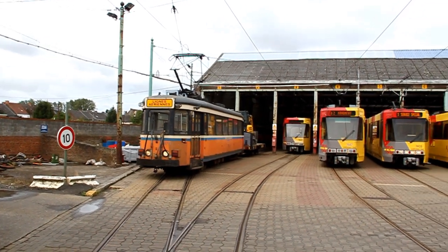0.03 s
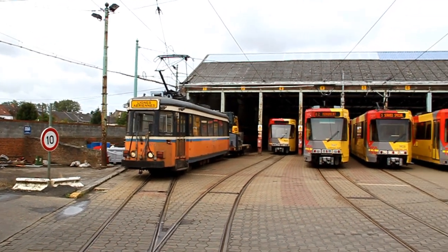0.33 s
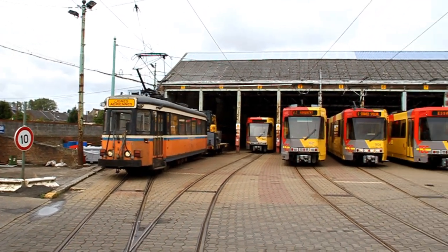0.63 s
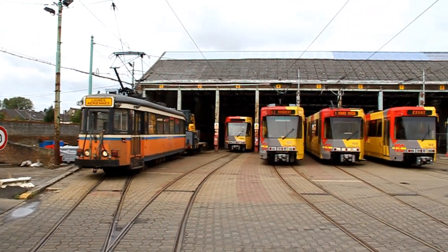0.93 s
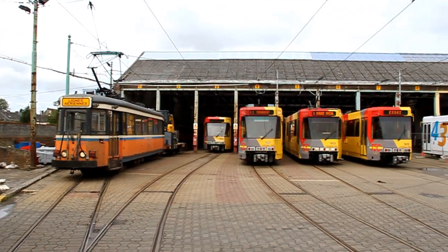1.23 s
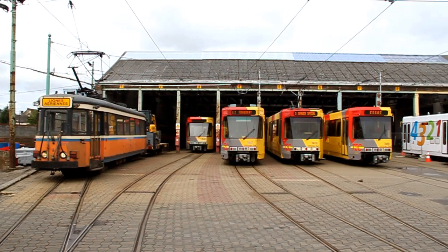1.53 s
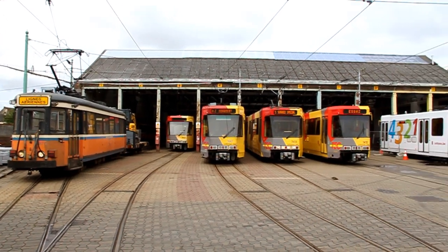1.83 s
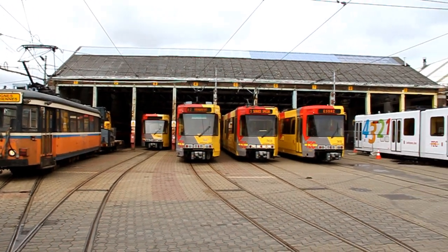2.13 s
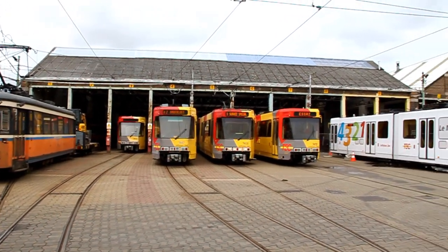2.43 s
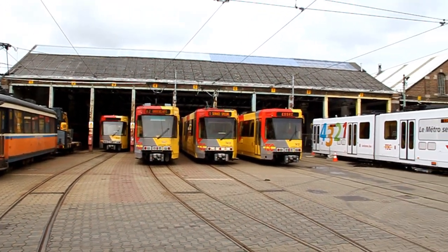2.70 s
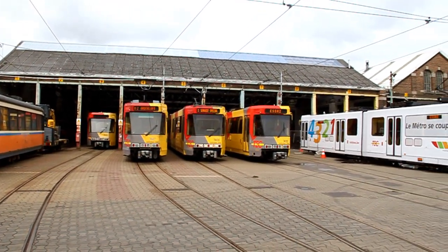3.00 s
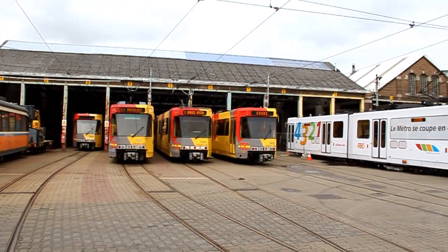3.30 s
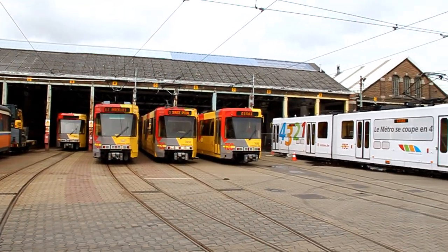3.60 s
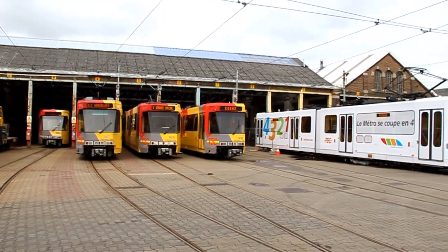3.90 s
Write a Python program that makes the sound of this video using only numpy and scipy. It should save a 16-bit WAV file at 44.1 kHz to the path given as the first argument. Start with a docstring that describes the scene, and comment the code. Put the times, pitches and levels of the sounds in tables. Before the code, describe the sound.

Gusty wind buffets the microphone with uneven rumbles, bumps and brief crackles.

```python
"""An open yard, where gusty wind buffets the microphone of a hand-held camera. Each gust is a burst of
turbulent eddies that brightens as it peaks; the hardest overdrive the capsule, which crackles. Knocks of air or
of the hand make bumps, and the hand rubs the housing, once in a soft, broad swell of hiss. Automatic gain
control ducks the whole sound, the yard's distant hiss included, after every strong gust."""
import sys
import numpy as np
from scipy import signal
from scipy.fft import rfft, irfft, next_fast_len
from scipy.io import wavfile
from scipy.ndimage import uniform_filter1d

SR = 44100
rng = np.random.default_rng(int(sys.argv[2]) if len(sys.argv) > 2 else 0)


def persist_wave(psi):
    """Save psi, clipped to +-1, as 16-bit WAV."""
    counts = np.round(np.clip(psi, -1, 1) * 32767).astype(np.int16)
    wavfile.write(sys.argv[1], SR, np.atleast_2d(counts).T)


N = 174195
TIME = np.arange(N) / SR
FFT_SIZE = next_fast_len(N, True)
FFT_HZ = np.fft.rfftfreq(FFT_SIZE, 1 / SR) + 1e-3


def amp(db):
    """Amplitude ratio of a level in decibels."""
    return 10 ** (np.asarray(db) / 20)


def unit(x):
    """Normalisation to rms 1."""
    return x / np.sqrt(np.mean(x ** 2) + 1e-20)


def noise(gain):
    """Spectral shaping: white noise weighted by a gain at each of FFT_HZ, at rms 1."""
    return unit(irfft(rfft(rng.standard_normal(FFT_SIZE)) * gain, FFT_SIZE)[:N])


def fluctuation(corner_hz):
    """Random modulation: low-pass noise of rms 1."""
    return noise(1 / (1 + (FFT_HZ / corner_hz) ** 2))


def coloured(spectrum):
    """Coloured noise of rms 1 from points of (frequency [Hz], relative level [dB])."""
    hz, db = np.transpose(spectrum)
    return noise(amp(np.interp(np.log(FFT_HZ), np.log(hz), db)))


def envelope(t, start, hold, rise, fall):
    """Exponential growth until start, a plateau, then exponential decay."""
    exponent = np.maximum(start - t, 0) / rise + np.maximum(t - start - hold, 0) / fall
    return np.exp(-np.minimum(exponent, 30))


def turbulence(hz, edge_hz, steepness=4.38):
    """Power spectral density of eddies: flat up to an edge, a falling power law above it."""
    return 1 / edge_hz / (1 + (hz / edge_hz) ** steepness)


def airflow_density(t, hz, edge_shake):
    """Incoherent sources add in power: a light breeze with random lulls, plus the gusts."""
    # (start [s], hold [s], relative level [dB], upper edge of the rumble [Hz])
    gusts = [(0.235, 0.055, -15, 233), (0.303, 0.015, -11, 194), (0.555, 0.017, -15.5, 198),
             (0.627, 0.026, -2.5, 280), (0.694, 0.024, -5.5, 377), (0.725, 0.088, -13, 395),
             (0.876, 0.034, -4.5, 375), (0.925, 0.04, -13.5, 396), (1.128, 0.094, -11.5, 197),
             (1.198, 0.044, -7, 242), (1.346, 0.099, -14, 180), (1.449, 0.048, -18, 386),
             (1.543, 0.041, -11.5, 272), (1.641, 0.035, -17.5, 274), (1.709, 0.027, -13.5, 255),
             (1.776, 0.045, -4, 430), (1.791, 0.0033, -9, 1420), (2.065, 0.044, -21.5, 328),
             (2.158, 0.0032, -6.5, 384), (2.229, 0.02, -7.5, 275), (2.363, 0.014, -3, 510),
             (2.437, 0.012, -2.5, 257), (2.484, 0.0023, -9.5, 398), (2.537, 0.023, -0.5, 530),
             (2.613, 0.038, -8, 570), (2.67, 0.075, -5.5, 445), (2.764, 0.036, -8.5, 375),
             (2.829, 0.011, -2.5, 660), (2.865, 0.03, -9.5, 516), (2.963, 0.012, -16.5, 159),
             (3.03, 0.01, -12, 199.2), (3.077, 0.0094, 3, 400), (3.11, 0.049, 1.5, 650),
             (3.172, 0.07, -12, 189), (3.308, 0.017, -6.5, 500), (3.352, 0.017, -10, 404),
             (3.49, 0.019, -7, 250), (3.599, 0.033, -9, 323), (3.667, 0.03, 2.5, 430),
             (3.711, 0.025, -4.5, 585), (3.741, 0.0028, -9.5, 1490), (3.804, 0.072, -14.5, 387),
             (3.933, 0.022, -17.5, 273)]
    breeze_db = -25 + 2.5 * np.clip(fluctuation(corner_hz=11)[::len(TIME) // len(t) + 1], -2, 2)
    density = amp(breeze_db) ** 2 * turbulence(hz, edge_hz=200 * edge_shake)
    for start, hold, db, edge_hz in gusts:
        pace = np.sqrt(edge_hz / 324)  # faster, brighter gusts come and go sooner
        swell = envelope(t, start, hold, rise=0.013 / pace, fall=0.019 / pace)
        density += (amp(db) * swell) ** 2 * turbulence(hz, edge_hz * edge_shake * swell ** 0.33)
    return density


def puff_spectrum(puffs_per_s=680, spread_db=2.3, smooth_db=-7, lag_cycles=0.6982):
    """Shot noise of pressure puffs over a smooth flow; dispersion makes each puff swing to and fro."""
    puffs = (rng.random(N) < puffs_per_s / SR) * np.sign(rng.standard_normal(N))
    puffs *= amp(spread_db * rng.standard_normal(N))
    flow = unit(puffs) + amp(smooth_db) * rng.standard_normal(N)
    return rfft(flow, FFT_SIZE) * np.exp(-2j * np.pi * lag_cycles * np.log(FFT_HZ))


def wind(bass_cut_hz=86, port_hz=3020, eddy_db=1.5, gain_db=-2.29):
    """Turbulent pressure at the microphone: each band of the puffs follows the power of the airflow."""
    t = TIME[::32]
    centres = np.geomspace(25, 16000, 20)
    hz, log_step = centres[:, None], np.log(centres[1] / centres[0])
    eddies = np.clip(fluctuation(corner_hz=66)[::32], -2.5, 2.5)  # shake both the edge and the level
    power = airflow_density(t, hz, edge_shake=np.exp(0.18 * (eddies - 0.25))) * hz * log_step
    power /= 1 + (bass_cut_hz / hz) ** 2  # the microphone's bass roll-off
    power /= 1 + (hz / port_hz) ** 6.9  # its port dulls the treble
    flow, out = puff_spectrum(), np.zeros(N)
    for centre, gain in zip(centres, np.sqrt(power) * amp(eddy_db * eddies)):
        triangle = np.maximum(1 - abs(np.log(FFT_HZ / centre)) / log_step, 0)
        band = unit(irfft(flow * triangle, FFT_SIZE)[:N])
        running_rms = np.sqrt(uniform_filter1d(band ** 2, size=900) + 0.05)
        out += band / running_rms * np.interp(TIME, t, gain)
    return amp(gain_db) * out


def bumps(width_cycles=0.52):
    """Impulsive excitation by air or hand: one pressure pulse with a swing back on either side."""
    # (time [s], peak level [dB], frequency [Hz])
    knocks = [(0.317, -8.5, 173), (0.6225, 2.5, 184), (0.649, 3.5, 336), (0.7024, 7, 323), (0.904, 0, 1130),
              (1.218, -6, 240), (1.480, -8, 314.3), (1.567, -4, 223), (1.7714, -9, 258), (1.794, 5, 490),
              (2.159, -4.5, 397), (2.487, -1, 335), (2.537, 5.5, 305), (2.668, -0.5, 670), (2.843, -7, 630),
              (3.034, 0, 258), (3.077, 13, 357), (3.36, 3, 251)]
    out = np.zeros(N)
    for time, db, hz in knocks:
        cycles = (TIME - time) * hz
        gaussian = np.exp(-np.minimum((cycles / width_cycles) ** 2, 50))
        out -= amp(db) * np.cos(2 * np.pi * cycles) * gaussian
    return out


def crackles(snap_s=0.00093):
    """Overload: noise in millisecond snaps and grainy crunch where the wind overdrives the capsule."""
    # (time [s], level [dB])
    overloads = [(1.7923, 2), (1.799, -2), (1.8151, -12), (2.366, -15), (2.834, -11.5), (3.078, -10),
                 (3.131, -1.5), (3.137, -11), (3.156, -8), (3.663, -5), (3.682, 0), (3.7, -4.5),
                 (3.7045, -6), (3.716, -7)]
    # sustained overload: (start [s], hold [s], level [dB])
    stretches = [(1.795, 0.024, -25), (3.112, 0.046, -19)]
    # (frequency [Hz], relative level [dB])
    spectrum = [(200, -17), (1000, 4), (3200, 2.5), (4200, -7.5), (6000, -19), (16000, -40)]
    snaps = sum(amp(db) * envelope(TIME, time, 0, snap_s / 2, snap_s) for time, db in overloads)
    crunch = sum(amp(db) * envelope(TIME, start, hold, snap_s, 2 * snap_s) for start, hold, db in stretches)
    grains = amp(4.5 * fluctuation(corner_hz=300))
    return (snaps + crunch * grains) * coloured(spectrum)


def swish(swells, spectrum, grain_db, grain_hz):
    """Amplitude modulation: coloured noise swells and fades with a random grain."""
    level = sum(amp(db) * envelope(TIME, peak, 0, rise, fall) for peak, rise, fall, db in swells)
    return level * coloured(spectrum) * amp(grain_db * fluctuation(grain_hz))


def rubs():
    """Friction noise: a hand slides over the housing."""
    # (peak time [s], rise [s], decay [s], level [dB])
    strokes = [(.475, .08, 0.087, -44.5), (.625, 0.047, 0.049, -44), (2.472, 0.00088, .011, -33)]
    # (frequency [Hz], relative level [dB])
    spectrum = [(1500, -10.5), (4200, 8), (6000, -2), (8500, -1), (16000, -11)]
    return swish(strokes, spectrum, grain_db=3.5, grain_hz=250)


def rub_swell():
    """Friction noise: one soft, broad swell of hiss as the hand rubs the housing."""
    # (peak time [s], rise [s], decay [s], level [dB])
    swell = (0.6, 0.06, 0.24, -31.5)
    # (frequency [Hz], relative level [dB])
    spectrum = [(150, -13), (500, 2.5), (2200, 1.5), (3900, -5), (6000, -30), (16000, -25)]
    return swish([swell], spectrum, grain_db=0.5, grain_hz=60)


def yard(wash_db=-32.5, hiss_db=-55, fade_db_per_s=1):
    """Ambient noise: a distant, nearly even wash, and a fine hiss that fades as the camera turns away."""
    # (frequency [Hz], relative level [dB])
    wash_spectrum = [(30, -26), (80, -2.5), (340, 2), (580, -6.5), (950, -10.5), (1500, -11), (3600, -18.5),
                     (4500, -23), (6000, -34.5), (16000, -63)]
    # (frequency [Hz], relative level [dB])
    hiss_spectrum = [(2000, -19), (5000, 1), (8500, 3), (12000, -2.5), (14500, -3), (16000, -17.5)]
    waver = amp(0.7 * fluctuation(corner_hz=12))
    wash = amp(wash_db) * coloured(wash_spectrum)
    hiss = amp(hiss_db - fade_db_per_s * TIME) * coloured(hiss_spectrum)
    return waver * (wash + hiss)


def scene():
    """Superposition of all sources at the one microphone."""
    return (rubs() + rub_swell() + wind() + bumps() + crackles() + yard())[None]


def record(dry, subsonic_hz=57, threshold_db=-9.5, recover_db_per_s=10.5, cutoff_hz=15850):
    """Compression: after a high-pass, the gain ducks fast and recovers slowly; then clip and low-pass."""
    x = signal.sosfilt(signal.butter(2, subsonic_hz, "highpass", fs=SR, output="sos"), dry[0])
    power = abs(uniform_filter1d(x ** 2, int(0.016 * SR)))
    over_db = np.maximum(10 * np.log10(power + 1e-12) - threshold_db, 0)
    recovery_db = recover_db_per_s * TIME
    held_db = np.maximum(np.maximum.accumulate(over_db + recovery_db), 3.5)  # starts already ducked
    x = x * amp(-uniform_filter1d(held_db - recovery_db, size=400))
    x = x / (1 + x ** 4) ** (1 / 4)  # soft clipping
    low_pass = signal.firwin(511, cutoff_hz, window=("kaiser", 9), fs=SR)
    return signal.oaconvolve(x, low_pass, "same")[None]


dry = scene()
out = record(dry)
persist_wave(out)
```